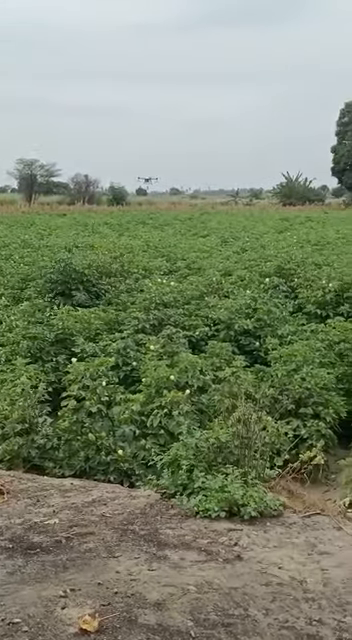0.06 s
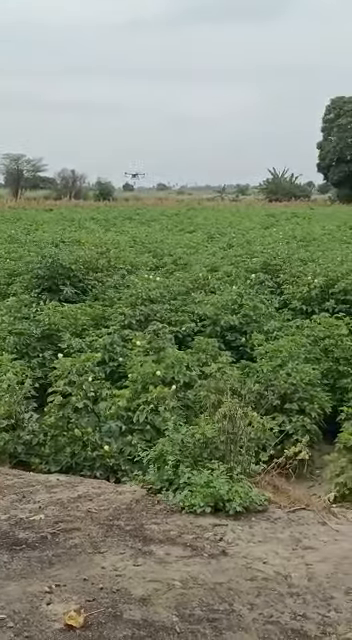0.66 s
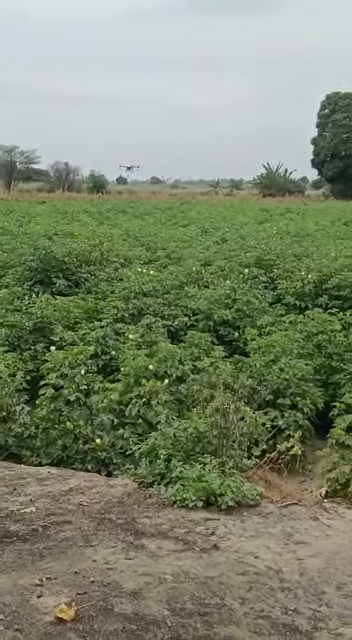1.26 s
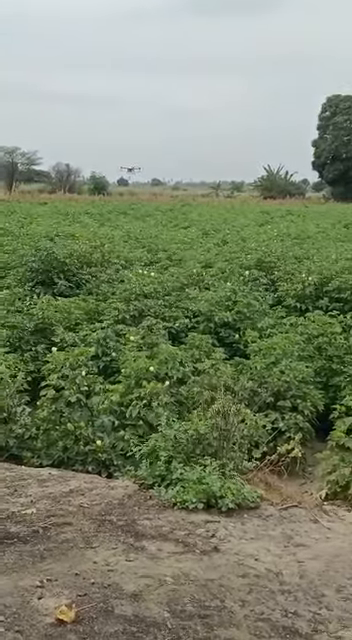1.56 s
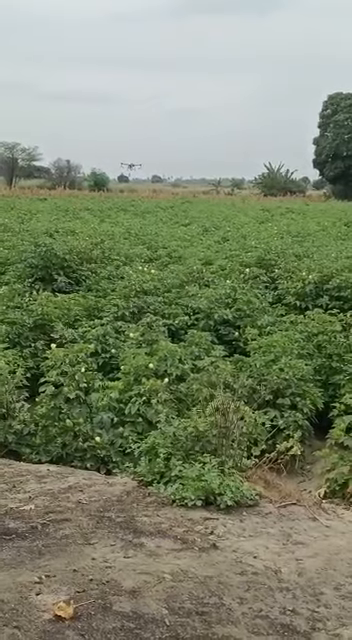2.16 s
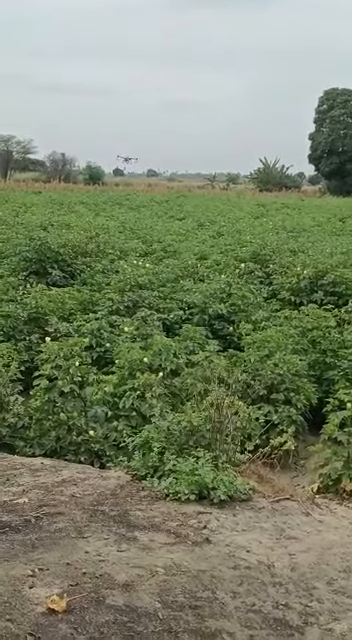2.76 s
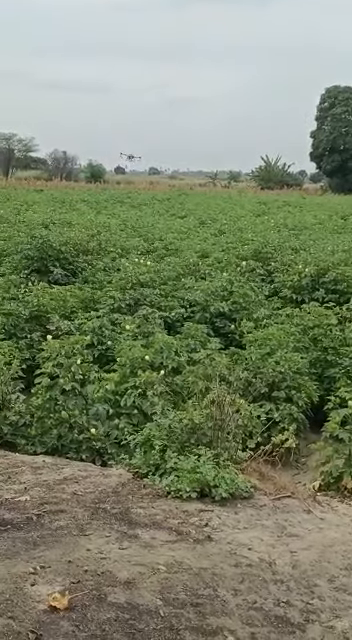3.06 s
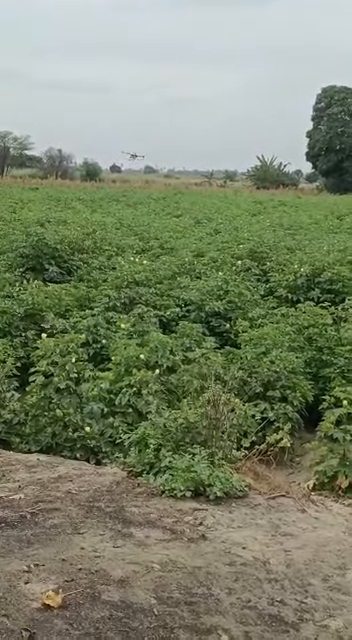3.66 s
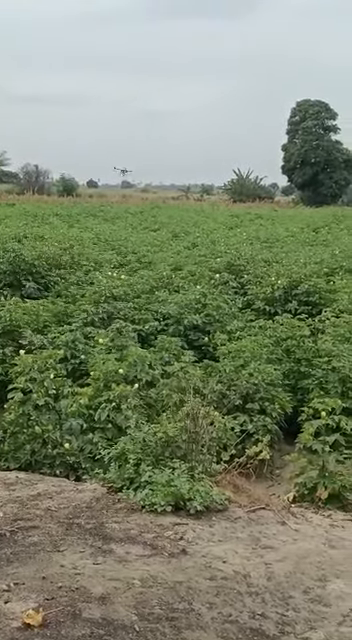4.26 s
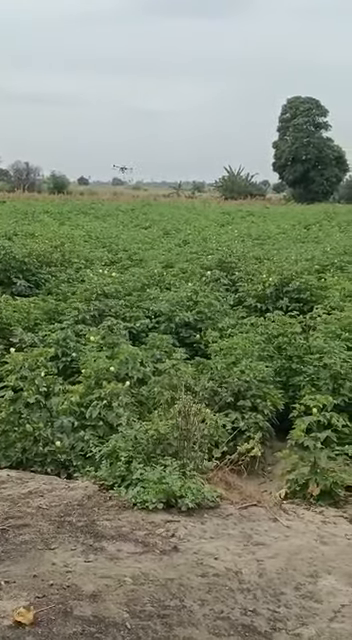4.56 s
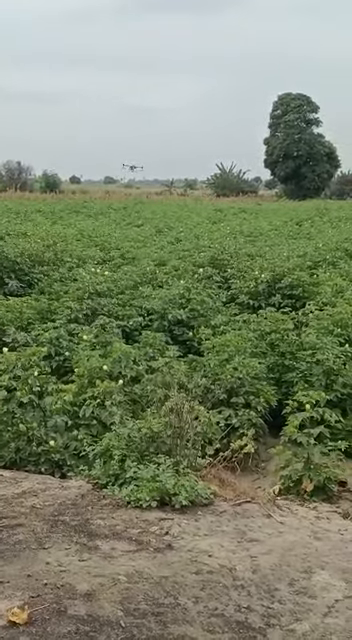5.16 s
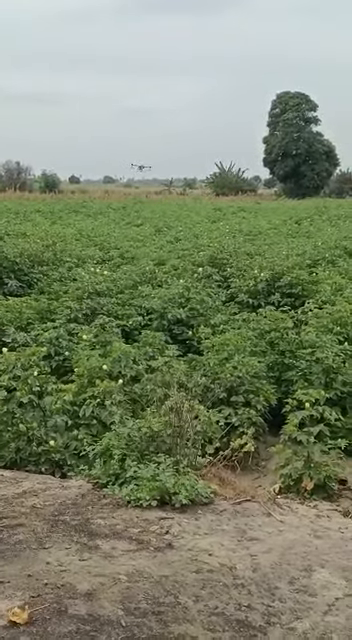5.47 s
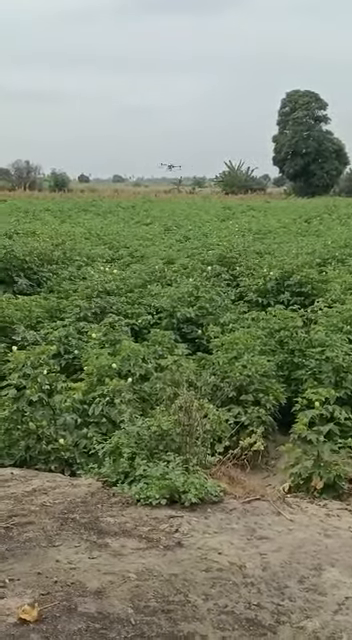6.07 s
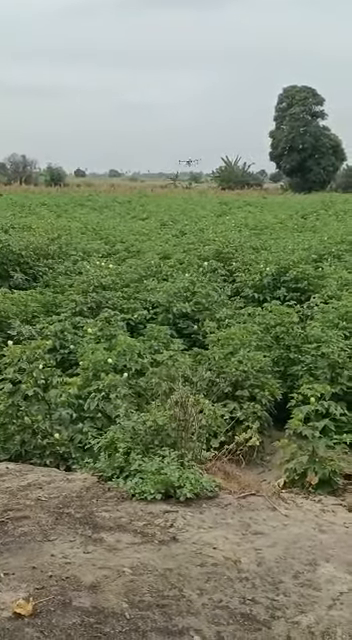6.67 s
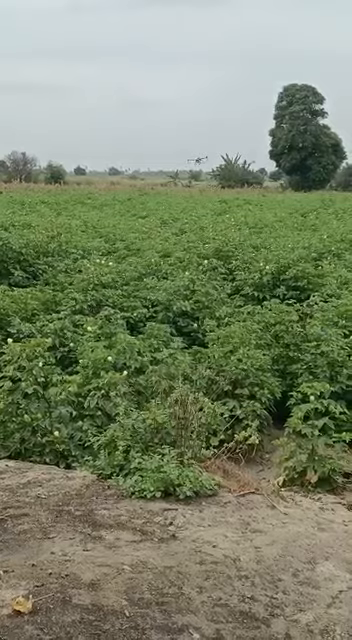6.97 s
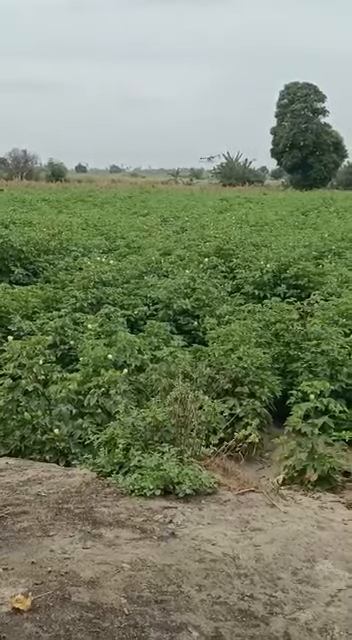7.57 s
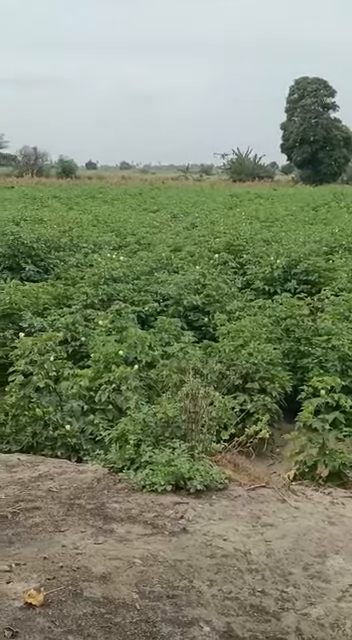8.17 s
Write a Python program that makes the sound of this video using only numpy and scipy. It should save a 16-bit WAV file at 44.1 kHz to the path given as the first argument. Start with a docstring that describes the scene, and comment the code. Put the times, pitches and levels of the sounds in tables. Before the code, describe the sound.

In an open field, irregular low wind rumble hits the microphone and dominates the sound. Thin chirps and a short whistled bird phrase, heard three times, come from the right. Behind them a distant drone whines quietly, speeds up briefly and carries on with a soft buzzing rush. The gusts weaken in the last part, as the drone rises once more in an airy hiss.

```python
"""Gusts buffet two microphone ports at the edge of a crop field, each port on its own. A far drone
gives a thin high whine, faint whistles come and go, and small birds chirp for the first five seconds.
At 0.9 s a songbird sings a four-note phrase. Near 2 s the drone revs up into hum and airy hiss,
and from 3 s its blades beat out a hollow buzzing rush. The phrase returns at 3.6 s and 6.6 s.
After 6 s the wind eases, and past 7 s the drone swells again into hiss and a broad surge."""
import sys
import numpy as np
from scipy import signal
from scipy.io import wavfile
from scipy.ndimage import uniform_filter1d

SR = 44100
rng = np.random.default_rng(int(sys.argv[2]) if len(sys.argv) > 2 else 0)


def transcribe(u):
    """Save the signal u as a 16-bit wav file named by the first command-line argument.

    u: samples, shape (n,) or (channels, n), limited to [-1, 1]; the rate is SR.
    q: integer samples, one column per channel.
    """
    v = np.clip(np.atleast_2d(u).T, -1, 1)
    q = np.round(v * 32767).astype(np.int16)
    wavfile.write(sys.argv[1], SR, q)


N = 371763
TIME = np.arange(N) / SR
LEFT, RIGHT = -1, 1


def from_db(db):
    """Decibels to gain."""
    return 10 ** (np.asarray(db) / 20)


def unit_rms(x):
    """Scale to rms 1."""
    return x / np.sqrt(np.mean(x ** 2) + 1e-20)


def in_time(rows):
    """Each column of a curve at every sample."""
    times_s, *columns = np.transpose(rows)
    return [np.interp(TIME, times_s, column) for column in columns]


def at_hz(spectrum, hz):
    """Read a spectrum on a log-frequency axis."""
    points_hz, points_db = np.transpose(spectrum)
    return np.interp(np.log(hz), np.log(points_hz), points_db)


def drift(rate_hz):
    """Smooth random motion, rms 1."""
    step, settle = 20, 4000
    pole = np.exp(-2 * np.pi * rate_hz * step / SR)
    white = rng.standard_normal(N // step + settle + 2)
    slow = signal.lfilter([1], [1, -2 * pole, pole * pole], white)[settle:]
    return np.interp(np.arange(N) / step, np.arange(len(slow)), unit_rms(slow))


def band(x, low_hz, high_hz, order=2):
    """Causal band-pass."""
    return signal.sosfilt(signal.butter(order, [low_hz, high_hz], "band", fs=SR, output="sos"), x)


def resonate(x, hz, width_hz):
    """One resonance, peak gain 1."""
    pole = np.exp(-np.pi * width_hz / SR)
    feedback = [1, -2 * pole * np.cos(2 * np.pi * hz / SR), pole * pole]
    return (1 - pole * pole) / 2 * signal.lfilter([1, 0, -1], feedback, x)


def place(x, left_db, lag_samples=3):
    """A source on the right reaches the left port weaker and later."""
    return np.array([from_db(left_db) * np.roll(x, lag_samples), x])


def stereo_noise(left_db, diffuse_db):
    """White noise from the right, plus a diffuse part in each port."""
    direct = place(rng.standard_normal(N), left_db)
    return direct + from_db(diffuse_db) * rng.standard_normal((2, N)) * from_db([[left_db], [0]])


# Steady air: freq_hz, density_db
AIR_SPECTRUM = [(60, 10.5), (200, 6.5), (340, 4), (450, -15.5), (620, 7), (760, -12), (960, -10),
                (1800, -16), (3200, -13.5), (4200, -21), (5400, -18), (7200, -24), (8500, -18),
                (10000, -25), (15000, -28.5)]

def field_air(level_db):
    """Background of the open field; each third of an octave wavers a little."""
    whites = [stereo_noise(left_db=-9.5, diffuse_db=3) for _ in range(2)]
    edges_hz, out = 60 * 2 ** (np.arange(25) / 3), 0
    for k, (low_hz, high_hz) in enumerate(zip(edges_hz, edges_hz[1:])):
        waver_db = (1.8 if low_hz < 3500 else .7) * drift(10)
        band_db = at_hz(AIR_SPECTRUM, np.sqrt(low_hz * high_hz)) + waver_db
        out += band(whites[k % 2], low_hz, high_hz, order=3) * from_db(band_db)
    return from_db(level_db + 1.1 * drift(3)) * unit_rms(out)


# Comb filter taps: delay_s, gain_db
COMB_TAPS = [(.0023, -17), (.0041, -31.5), (.0093, -11.5)]

def comb_colour(x):
    """A comb filter gives the background hiss a faint ringing colour."""
    return x + sum(from_db(db) * np.roll(x, round(delay_s * SR), axis=1) for delay_s, db in COMB_TAPS)


# The drone revs up, eases off, cruises: time_s, blade_rate_hz
BLADE_RATE = [(0, 66), (1.55, 77), (1.68, 92), (1.82, 100), (2.0, 110.6), (2.18, 108), (2.36, 103),
              (2.5, 88), (2.8, 78), (3.25, 78), (3.6, 75), (3.9, 88.4), (4.5, 94), (5.3, 79.3), (6.2, 80.6),
              (6.8, 83), (8.43, 71.5)]

def rotor_phase(wander, jitter):
    """Phase in radians, one cycle per passing blade."""
    rate_hz, = in_time(BLADE_RATE)
    return 2 * np.pi * np.cumsum(rate_hz * (1 + wander * drift(12) + jitter * drift(90))) / SR


def blade_slaps(phase, uneven_db, top_hz):
    """One uneven click per passing blade, dulled by distance."""
    clicks = np.diff(phase // (2 * np.pi), prepend=0) * from_db(uneven_db * drift(60))
    return band(unit_rms(clicks), 180, top_hz)


def swell_db(swells, rest_db):
    """Level curve: each swell climbs 20 dB over its attack, holds, sinks 20 dB over its release."""
    power = from_db(rest_db) ** 2
    for full_s, hold_s, db, attack_s, release_s in swells:
        away = np.maximum((full_s - TIME) / attack_s, (TIME - full_s - hold_s) / release_s).clip(0)
        power += from_db(db - 20 * away) ** 2
    return 10 * np.log10(power)


def rotor_noise(modes, slaps, band_hz, left_db, diffuse_db, waver_db=6, flicker_db=2.5):
    """Noise and blade slaps in steep resonances, each wavering on its own; rms 1."""
    drives = [band(stereo_noise(left_db, diffuse_db) + place(slaps, left_db), *band_hz, order=3)
              for _ in range(2)]
    out = 0
    for k, (hz, width_hz, db) in enumerate(modes):
        gain = from_db(db + waver_db * np.tanh(drift(10)) + flicker_db * drift(30))
        out += gain * resonate(resonate(drives[k % 2], hz, 2 * width_hz), hz, 2 * width_hz)
    return unit_rms(out)


# Rush envelope: time_s, level_db
RUSH_LEVEL = [(0, -80), (3.05, -83.5), (3.15, -69), (3.5, -70.5), (4.3, -68.5), (4.58, -73.5), (4.66, -58),
              (4.85, -70), (5.0, -66.5), (6.2, -71), (8.43, -81.5)]
# Rush resonances: centre_hz, width_hz, gain_db
RUSH_MODES = [(753, 126, 4), (810, 7.1, -32), (1067, 250, -1.5), (1276, 93, -3), (1667, 161, 2.5),
              (1750, 70, -15), (2362, 92, 4), (2665, 160, -3.5), (3490, 360, -11), (3764, 28, 0.5)]

def rotor_rush(phase, slaps, gain_db):
    """Hollow rush; each passing blade gives it a puff."""
    noise = rotor_noise(RUSH_MODES, from_db(-3) * slaps, (470, 4100), left_db=-7, diffuse_db=-11)
    chop = unit_rms(np.exp(0.31 * np.cos(phase)))
    return from_db(gain_db + in_time(RUSH_LEVEL)[0]) * noise * chop


# Surge envelope: full_s, hold_s, level_db, attack_s, release_s
SURGE_SWELLS = [(7.35, 0.42, -58.5, 0.76, 0.66)]
# Surge resonances: centre_hz, width_hz, gain_db
SURGE_MODES = [(767, 110, -1), (1200, 110, 1.5), (1585, 273, -2), (1540, 180, -6.5), (1953, 260, -4.5),
               (2268, 35, -2.5), (2200, 400, -17)]

def rotor_surge(slaps, gain_db):
    """One broad, late surge of the rush."""
    noise = rotor_noise(SURGE_MODES, from_db(-5) * slaps, (570, 3100), left_db=-9.5, diffuse_db=-10)
    return from_db(gain_db + swell_db(SURGE_SWELLS, rest_db=-79)) * noise


# Hiss envelope: full_s, hold_s, level_db, attack_s, release_s
HISS_SWELLS = [(1.935, 0.32, -62, 0.18, 0.31), (7.2, 0.29, -64, 0.56, 0.37)]
# Hiss resonances: centre_hz, width_hz, gain_db
HISS_MODES = [(473, 14, -12), (1273, 31, -6), (1857, 350, -1.5), (2170, 40, 2), (2366, 110, 0.5),
              (2823, 150, 0.5), (3210, 190, 2), (3684, 69, 4), (4384, 100, -5), (5030, 160, 0.5),
              (5430, 140, -3.5), (5650, 26, 2), (6240, 450, -9.5), (7860, 460, -16.5), (8650, 240, -12),
              (11600, 1100, -23.5)]

def rotor_hiss(slaps, gain_db):
    """Airy hiss of the rotors, swelling twice."""
    noise = rotor_noise(HISS_MODES, from_db(3) * slaps, (504, 13200), left_db=-5.5, diffuse_db=4)
    return from_db(gain_db + swell_db(HISS_SWELLS, rest_db=-79.5)) * noise


# Hum partials: blade_harmonic, gain_db
HUM_HARMONICS = [(2, -2.5), (3, 4.5), (4, -16), (5, -2), (6, -5.5), (7, -6.5)]
# Hum envelope: full_s, hold_s, level_db, attack_s, release_s
HUM_SWELLS = [(1.86, 0.4, -65.5, 0.074, 0.2)]

def rotor_hum(phase, waver_db, stray_rad):
    """Low blade harmonics, heard as the drone revs up."""
    hum = sum(from_db(db + waver_db * drift(21)) * np.sin(k * phase + stray_rad * drift(18))
              for k, db in HUM_HARMONICS)
    return place(from_db(swell_db(HUM_SWELLS, rest_db=-93.5)) * hum, left_db=-16)


def note_span(start_s, length_s):
    """A note's sample indices and its progress, 0 to 1."""
    span = np.flatnonzero((TIME >= start_s) & (TIME < start_s + length_s))
    return span, (TIME[span] - start_s) / length_s


# Buzzing notes in the hiss and rush: start_s, length_s, start_hz, end_hz, level_db
HOLLOW_NOTES = [(1.92, 0.062, 1700, 1760, -63), (1.93, 0.21, 1900, 1810, -63.5),
                (2.02, 0.185, 3250, 3170, -66), (1.915, 0.038, 2270, 2160, -60),
                (7.59, .1, 1720, 1570, -58.5), (2.015, .27, 1190, 1315, -60.5),
                (2.147, 0.17, 2220, 2150, -58), (2.387, 0.17, 2210, 2240, -63.5),
                (3.095, 0.12, 1210, 1280, -65.5), (3.1, 0.15, 1800, 1930, -73), (3.09, 0.36, 844, 870, -76),
                (3.27, 0.11, 1310, 1270, -70), (3.877, 0.15, 700, 747, -64.5),
                (4.02, 0.47, 2400, 2340, -69), (4.48, 0.096, 1620, 1630, -69.5),
                (4.615, 0.1, 2350, 2100, -67), (4.76, 0.13, 1640, 1580, -71.5),
                (4.613, 0.11, 730, 780, -63), (4.603, 0.13, 1760, 1770, -63.5), (4.96, 0.17, 790, 850, -67),
                (4.9, 0.1, 1610, 1680, -64.5), (5.163, 0.13, 844, 650, -66), (5.152, 0.42, 2320, 2200, -76),
                (5.453, 0.16, 850, 743, -65), (5.83, 0.18, 780, 757, -67.5), (7.154, 0.12, 750, 830, -64.5),
                (7.25, 0.16, 1230, 1260, -62), (7.45, 0.22, 1240, 1140, -62),
                (7.58, 0.11, 1380, 1363, -62.5), (7.47, 0.21, 774, 756, -60.5),
                (7.734, 0.1, 770, 730, -61.5), (7.813, 0.297, 1290, 1184, -65), (7.942, .12, 767, 710, -66),
                (8.113, .14, 730, 720, -66.5), (8.09, 0.2, 1190, 1260, -66)]

def hollow_buzz(phase, gain_db, width_hz, flicker_db):
    """A narrow gliding resonance lifts the two or three blade harmonics under it."""
    rate_hz, = in_time(BLADE_RATE)
    out, flicker = np.zeros(N), from_db(flicker_db * drift(32))
    for start_s, length_s, start_hz, end_hz, db in HOLLOW_NOTES:
        span, progress = note_span(start_s, length_s)
        centre_hz = start_hz + (end_hz - start_hz) * progress
        harmonics = np.round(start_hz / rate_hz[span].mean()) + np.arange(-5, 6)[:, None]
        lift = np.exp(-((harmonics * rate_hz[span] - centre_hz) / width_hz) ** 2 / 2)
        partials = lift * np.sin(harmonics * phase[span] + rng.normal(0, 1, harmonics.shape))
        out[span] += from_db(db) * np.sin(np.pi * progress) ** .5 * flicker[span] * partials.sum(axis=0)
    return from_db(gain_db) * place(out, left_db=-13)


# Whine envelope: time_s, level_db
WHINE_LEVEL = [(0.0, -77), (0.68, -85.5), (1.01, -71.5), (1.24, -84.5), (1.52, -83), (1.76, -102),
               (2.63, -95), (2.72, -77.5), (2.96, -63.5), (3.31, -96), (3.85, -83.5), (4.48, -85),
               (4.84, -99.5), (5.87, -98.5), (6.01, -84), (6.27, -97), (6.57, -89.5), (7.28, -100),
               (7.61, -87), (7.65, -73.5), (7.84, -85.5), (8.08, -79), (8.12, -94), (8.43, -90)]
# Whine tuning: time_s, pitch_hz, sidebands_db
WHINE_PITCH = [(0, 12880, -16.5), (1.5, 12840, -16), (1.68, 12720, -7), (2.55, 12400, 0.5),
               (2.76, 12810, 0.5), (2.95, 12700, -6), (3.2, 12740, -3.5), (3.45, 12900, -5),
               (3.9, 12830, -11), (4.7, 12880, -7.5), (6.0, 12880, -7.5), (7.6, 12810, -8),
               (8.43, 12890, -13)]
# Whine sidebands: offset_blade_rates, gain_db
WHINE_SIDEBANDS = [(-4, -12), (1, -2.5), (4, 3)]

def whine(gain_db, left_db, lag_s):
    """Thin high tone, perhaps from the motor drives; sidebands set by the blade rate beat against it."""
    level_db, = in_time(WHINE_LEVEL)
    rate_hz, = in_time(BLADE_RATE)
    pitch_hz, sidebands_db = in_time(WHINE_PITCH)
    pitch_hz += 13 * drift(150) + 8 * drift(8.4)
    partials = [(0, 0)] + [(k, db + sidebands_db + 2 * drift(9.5)) for k, db in WHINE_SIDEBANDS]
    tone = sum(from_db(db) * np.exp(2j * np.pi * np.cumsum(pitch_hz + k * rate_hz) / SR)
               for k, db in partials)
    rasp = from_db(-16) * unit_rms(band(rng.standard_normal((2, N)), 12450, 13400, order=3))
    ports = np.real([tone * np.exp(-2j * np.pi * pitch_hz * lag_s), tone]) + rasp
    flicker_db = 2 * drift(60) + 2 * drift(9.3)
    return ports * from_db([[left_db], [0]]) * from_db(gain_db + level_db + flicker_db)


def slurs(notes, buzz_hz, buzz_depth, flicker_db, taper, lag_samples=3):
    """Each note is a sine gliding along an arc; a fast pitch wobble makes it buzz."""
    out = np.zeros((2, N))
    wobble = 1 + buzz_depth * drift(buzz_hz)
    flicker = from_db(flicker_db * drift(79))
    for start_s, length_s, start_hz, mid_hz, end_hz, db, left_db in notes:
        span, progress = note_span(start_s, length_s)
        arc = np.polyfit([0, .5, 1], [start_hz, mid_hz, end_hz], 2)
        pitch_hz = np.polyval(arc, progress) * wobble[span]
        phase = 2 * np.pi * np.cumsum(pitch_hz) / SR
        envelope = from_db(db) * np.abs(np.sin(np.pi * progress)) ** taper * flicker[span]
        left = from_db(left_db) * np.sin(phase - 2 * np.pi * pitch_hz * lag_samples / SR)
        out[:, span] += envelope * np.array([left, np.sin(phase)])
    return out


def field_echo(x, t60_s, wet_db):
    """Leaves and ground scatter a thin, quickly dying tail."""
    delay_s = TIME[:SR // 2]
    scatter = rng.standard_normal((2, len(delay_s))) * from_db(-60 * delay_s / t60_s) * (delay_s > .006)
    scatter /= np.sqrt(np.sum(scatter ** 2, axis=1, keepdims=True))
    return x + from_db(wet_db) * signal.fftconvolve(x, scatter, axes=1)[:, :N]


# Thin whistles: start_s, length_s, start_hz, end_hz, level_db
WHISTLES = [(1.507, 0.05, 2580, 2530, -62.5), (1.68, 0.036, 3770, 3790, -62),
            (1.7, 0.16, 4050, 4550, -63.5), (1.768, 0.16, 4000, 4060, -65),
            (1.839, 0.42, 5730, 5460, -62.5), (2.246, 0.15, 4540, 4100, -66),
            (2.283, 0.18, 4000, 3680, -71), (3.448, 0.32, 5650, 5420, -68), (3.55, 0.24, 6500, 6380, -72.5),
            (4.473, 0.28, 5400, 5050, -70.5), (5.77, 0.08, 4400, 4500, -69),
            (5.825, 0.078, 5400, 3576, -62.5), (5.885, 0.085, 3610, 3240, -65),
            (6.005, 0.1, 2980, 2184, -64.5), (6.045, 0.046, 5400, 7690, -67),
            (6.096, 0.03, 7500, 4400, -68), (6.919, 0.26, 3364, 2985, -61),
            (6.888, 0.56, 5010, 4920, -71.5), (7.1, 0.18, 5530, 5820, -68), (7.632, 0.1, 5540, 4686, -58.5),
            (7.721, 0.089, 3880, 2100, -51.5)]

def whistles(gain_db, left_db):
    """Faint unsteady glides, blurred by scattering."""
    notes = [(start_s, length_s, start_hz, np.sqrt(start_hz * end_hz), end_hz, db, left_db)
             for start_s, length_s, start_hz, end_hz, db in WHISTLES]
    glides = slurs(notes, buzz_hz=300, buzz_depth=.004, flicker_db=4, taper=.8)
    return from_db(gain_db) * field_echo(glides, t60_s=0.15, wet_db=-2)


# Chirps: start_s, length_s, start_hz, end_hz, level_db
CHIRPS = [(.005, 0.049, 4750, 6000, -55), (0.624, 0.037, 5020, 5400, -68), (0.662, .016, 5960, 7060, -61.5),
          (1.029, 0.082, 5220, 5770, -62.5), (1.355, 0.056, 5170, 5370, -68),
          (1.39, 0.018, 6400, 7040, -64.5), (1.511, 0.022, 5300, 5470, -61),
          (1.602, 0.049, 5240, 4940, -58.5), (1.637, 0.037, 6450, 6300, -69),
          (2.227, 0.03, 5080, 5580, -53.5), (2.47, .02, 5176, 4995, -57), (2.476, 0.021, 4940, 5180, -56),
          (2.668, 0.018, 5010, 5100, -53.5), (2.708, 0.017, 4990, 4370, -62),
          (2.713, 0.0203, 4520, 5500, -58), (2.748, 0.016, 5100, 5220, -52),
          (2.776, 0.062, 5290, 5040, -66), (3.095, 0.011, 5080, 5034, -56.5),
          (3.106, 0.014, 4480, 5450, -59), (3.12, 0.015, 5460, 5200, -52),
          (3.266, 0.023, 5070, 4845, -57.5), (3.309, 0.023, 4860, 4900, -70),
          (4.356, 0.043, 5110, 5450, -59), (5.059, 0.021, 5190, 5320, -59.5),
          (5.09, 0.022, 4990, 5950, -61.5), (5.105, 0.018, 6540, 7300, -71),
          (5.317, 0.049, 5192, 4780, -60.5)]

def small_birds(gain_db, left_db, mid_share=0.26):
    """High buzzy chirps, most flicking upward."""
    notes = [(start_s, length_s, start_hz, start_hz + mid_share * (end_hz - start_hz), end_hz, db, left_db)
             for start_s, length_s, start_hz, end_hz, db in CHIRPS]
    chirps = slurs(notes, buzz_hz=500, buzz_depth=.033, flicker_db=3.5, taper=.85)
    return from_db(gain_db) * field_echo(chirps, t60_s=0.27, wet_db=-4.5)


# Slurs of the phrase: offset_s, length_s, start_hz, mid_hz, end_hz, level_db, left_db
PHRASE = [(0, 0.025, 3310, 3202, 3080, 3.5, -23), (0.040, 0.018, 2320, 1960, 1780, -7, -16),
          (0.09, 0.031, 1623, 2557, 2710, 0.5, -12), (.111, .061, 2760, 2520, 1800, 3.5, -14.5),
          (0.193, .042, 1652, 2224, 1700, -1, -15.5)]
# Repeats of the phrase: start_s, level_db, onset_stretch, fade_db_per_s
SONGS = [(0.938, -43.5, 0.97, -13), (3.61, -40, 0.99, 20), (6.581, -42, 1.0, 27)]

def songbird(gain_db):
    """One whistled phrase, three times; two of its five slurs join into one note."""
    notes = [(start_s + stretch * offset_s, length_s, *arc_hz, song_db + db - fade * offset_s, left_db)
             for start_s, song_db, stretch, fade in SONGS
             for offset_s, length_s, *arc_hz, db, left_db in PHRASE]
    song = slurs(notes, buzz_hz=200, buzz_depth=0.0041, flicker_db=2, taper=1)
    return from_db(gain_db) * field_echo(song, t60_s=0.46, wet_db=-11)


def bump(centre_s, half_width_s):
    """Gaussian pulse, peak 1."""
    return np.exp(-np.minimum(((TIME - centre_s) / half_width_s) ** 2, 20))


# Buffets on top of the breeze: time_s, level_db, port, brightening_oct
BUFFETS = [(0.211, -45.5, 1, -0.38), (0.354, -49, -1, 0.53), (0.36, -44, 1, 0.17), (0.575, -35, 1, -0.18),
           (0.629, -38, 1, 0.0), (0.668, -39, -1, -0.09), (0.735, -39.5, -1, -0.051),
           (0.857, -33.5, -1, 0.53), (1.058, -34.5, -1, -0.01), (1.062, -43, 1, -0.049),
           (1.135, -37.5, -1, 0.41), (1.19, -37, -1, 0.077), (1.208, -34.5, 1, -0.24),
           (1.276, -37.5, -1, 0.071), (1.331, -39.0, 1, -0.32), (1.35, -45, -1, 0.46),
           (1.425, -43, 1, -0.35), (1.543, -40.5, -1, -0.69), (1.853, -42.5, -1, -0.56),
           (1.854, -43, 1, 0.34), (1.901, -35.0, 1, -0.15), (1.933, -39.5, -1, -0.14),
           (2.081, -38.5, 1, -0.15), (2.088, -41, -1, 0.23), (2.218, -37.0, 1, 0.071),
           (2.301, -32, 1, 0.19), (2.343, -34.5, -1, 0.37), (2.47, -45, 1, 0.3), (2.506, -39.0, 1, 0.6),
           (2.576, -34.5, -1, 0.11), (2.604, -34.0, 1, 0.3), (2.685, -33.5, -1, -0.12),
           (2.74, -38.5, -1, 0.16), (2.74, -31.5, 1, -0.12), (2.887, -36, 1, 0.11), (2.931, -38, -1, 0.21),
           (2.992, -34.5, -1, 0.6), (3.042, -37.5, 1, -0.13), (3.109, -39, -1, -0.55),
           (3.169, -32.5, -1, -0.36), (3.348, -36.5, -1, 0.51), (3.4, -43, 1, -0.45),
           (3.413, -35.5, -1, -0.29), (3.473, -35, -1, 0.0094), (3.606, -35.5, -1, 0.23),
           (3.678, -42, 1, 0.38), (3.708, -40, -1, 0.41), (3.829, -31, -1, 0.31), (3.955, -43, -1, -0.5),
           (4.061, -41.5, -1, 0.19), (4.162, -42, 1, -0.05), (4.274, -44.5, -1, -0.39),
           (4.408, -34.5, 1, -0.05), (4.461, -33, -1, 0.3), (4.496, -34.5, 1, 0), (4.517, -34.0, -1, -0.65),
           (4.602, -37.5, -1, -0.49), (4.662, -34.5, 1, -0.4), (4.698, -38.5, 1, 0.18),
           (4.745, -38, 1, -0.048), (4.857, -38, 1, -0.38), (4.929, -36.5, -1, -0.35),
           (4.936, -48, 1, 0.59), (5.06, -34.5, -1, 0.66), (5.092, -33, 1, -0.6), (5.164, -41.5, 1, -0.09),
           (5.202, -37, -1, 0.15), (5.262, -32, 1, 0.3), (5.337, -33, 1, 0.25), (5.351, -36, -1, 0.12),
           (5.393, -30.5, 1, 0.039), (5.501, -40, -1, 0.27), (5.581, -46.5, 1, -0.1),
           (5.587, -39, -1, -0.53), (5.649, -43.5, -1, -0.6), (5.806, -42.5, 1, 0.61),
           (5.934, -43, -1, -0.5), (6.507, -50, -1, -0.36), (6.766, -40.5, 1, -0.14),
           (6.8, -46.5, -1, -0.38), (6.85, -50, 1, -0.033), (6.895, -46, 1, 0.67), (7.004, -40.5, 1, 0.2),
           (7.312, -45.5, 1, -0.4), (7.369, -42, 1, 0.24), (7.505, -39, 1, 0.46), (7.669, -42.5, 1, 0.15),
           (7.829, -44.5, 1, -0.13)]
# Lulls between eddies: time_s, depth_db, port
LULLS = [(0.894, 13, 1), (1.086, 14, 1), (2.175, 9.7, -1), (2.488, 18, 1), (2.499, 14, -1), (2.587, 18, 1),
         (2.815, 27, -1), (2.825, 15.2, 1), (3.3, 8, -1), (4.356, 20, -1), (4.558, 29, 1), (4.96, 19, 1),
         (4.962, 6.2, -1), (5.194, 12, 1), (5.678, 14.3, 1), (5.702, 22, -1), (6.973, 20, 1)]

def wind_strength(gusts, port, eddy_db):
    """Level and brightening at one port from the breeze, its buffets and its lulls."""
    breeze_db = in_time(gusts)[0] + eddy_db * np.minimum(drift(10.3), .6)
    power, bright_oct = from_db(breeze_db) ** 2, 0
    for time_s, db, side, octaves in BUFFETS:
        if side == port:
            buffet = bump(time_s, half_width_s=0.017)
            power += (from_db(db) * buffet) ** 2
            bright_oct += octaves * buffet
    lulls_db = sum(db * bump(time_s, half_width_s=0.02) for time_s, db, side in LULLS if side == port)
    return 10 * np.log10(power) - lulls_db, bright_oct


# Rumble of a moderate breeze: freq_hz, density_db
RUMBLE_SPECTRUM = [(20, -27.5), (45, -17), (75, -1), (110, -0.5), (170, -4.5), (260, -10), (400, -13.5),
                   (600, -17), (850, -23.5), (1200, -82.5)]

def rumble(level_db, bright_oct, corner_hz, steepness, lump_db, flutter_db):
    """Turbulence at one port: harder wind sheds smaller eddies, so the rumble reaches higher."""
    moderate_db, db_per_oct = -38, 18
    lumps = np.clip(drift(28), -2, 2)
    reach_hz = corner_hz * 2 ** (bright_oct + (level_db - moderate_db + flutter_db * lumps) / db_per_oct)
    whites = rng.standard_normal((2, N))
    edges_hz, out = 18 * 2 ** (np.arange(13) / 2), 0
    for k, (low_hz, high_hz) in enumerate(zip(edges_hz, edges_hz[1:])):
        centre_hz = np.sqrt(low_hz * high_hz)
        gain = from_db(at_hz(RUMBLE_SPECTRUM, centre_hz)) / np.sqrt(1 + (centre_hz / reach_hz) ** steepness)
        out += gain * band(whites[k % 2], low_hz, high_hz, order=3)
    out *= from_db(lump_db * lumps)
    # Over more than a few eddies, the gust alone sets the loudness.
    power = uniform_filter1d(uniform_filter1d(out ** 2, size=1300), size=700)
    return from_db(level_db) * out / np.sqrt(power + 1e-20)


# Single eddies at the left port: time_s, level_db
THUMPS = [(.851, -25), (0.876, -36.5), (2.349, -30.5), (3.339, -28.5), (3.354, -24.5), (3.387, -29.5),
          (3.505, -28), (3.533, -22), (3.603, -26.5), (3.828, -22), (5.063, -24), (5.468, -31),
          (5.501, -31)]

def thumps(width_s, top_hz):
    """An eddy crossing the port gives one quick dip of pressure."""
    dips = sum(-from_db(db) * np.exp(-np.abs(TIME - time_s + width_s).clip(0, .1) / width_s)
               for time_s, db in THUMPS)
    return band(dips, 110, top_hz)


def port_filter(x, low_hz, top_hz):
    """The port passes no slow pressure, and eddies smaller than it cancel across it."""
    x = signal.sosfilt(signal.butter(2, low_hz, "high", fs=SR, output="sos"), x)
    return signal.sosfilt(signal.butter(10, top_hz, fs=SR, output="sos"), x)


# Breeze at each port: time_s, level_db
GUSTS_LEFT = [(0.0, -83.5), (0.13, -83), (0.18, -58.5), (0.52, -50), (0.62, -36), (0.95, -43.5),
              (1.3, -39.5), (1.7, -48.5), (2.2, -46.5), (2.5, -44.5), (2.62, -42), (2.95, -39.0),
              (3.65, -33.5), (3.9, -43.5), (4.2, -53.0), (4.33, -52.5), (4.45, -39), (4.58, -48),
              (5.05, -41.5), (5.5, -39.5), (5.66, -59.0), (5.7, -64), (5.76, -54), (5.95, -44), (6.16, -64),
              (6.75, -64.5), (6.93, -79), (7.68, -80.5), (7.95, -64), (8.43, -77)]
GUSTS_RIGHT = [(0.0, -56.5), (0.48, -53), (0.56, -43), (0.82, -47.5), (0.9, -62), (1.0, -50.5),
               (1.33, -44.0), (1.56, -63), (1.66, -59.5), (1.8, -47.0), (2.4, -48), (3.1, -43), (3.27, -71),
               (3.39, -44), (3.6, -60.5), (4.0, -51.0), (4.3, -57), (4.42, -42.0), (5.35, -39), (5.6, -54),
               (5.72, -62.5), (5.78, -35.5), (6.0, -79), (6.55, -65), (6.78, -43.5), (7.05, -44),
               (7.14, -67), (7.35, -51.5), (7.8, -50.5), (8.1, -67), (8.43, -67)]
# Left-port rumble turns brighter and duller: time_s, brightening_oct
LEFT_BRIGHTNESS = [(0, 0.083), (0.65, 0.18), (1.0, 0.018), (1.5, 0.23), (2.0, -0.05), (2.7, 0.085),
                   (3.7, 0.017), (4.0, 0.35), (4.4, -0.22), (4.7, -.4), (5.1, -0.021), (5.7, .1),
                   (6.0, -.4), (6.5, 0.0089)]

def wind():
    """Each port is buffeted on its own; the left rumbles higher up and takes the thumps."""
    left_db, left_oct = wind_strength(GUSTS_LEFT, LEFT, eddy_db=2)
    left_oct += in_time(LEFT_BRIGHTNESS)[0]
    left = rumble(left_db, left_oct, corner_hz=258.6, steepness=8.55, lump_db=2.5, flutter_db=3.5)
    right_db, right_oct = wind_strength(GUSTS_RIGHT, RIGHT, eddy_db=2.5)
    right = rumble(right_db, right_oct, corner_hz=157.2, steepness=11.7, lump_db=4.5, flutter_db=-2)
    left = from_db(1.06) * left + from_db(7.5) * thumps(width_s=0.0014, top_hz=645)
    return np.array([port_filter(left, low_hz=50.4, top_hz=804),
                     port_filter(from_db(1.54) * right, low_hz=47, top_hz=340.6)])


def scene():
    """Open field, far drone and birds under wind on the ports."""
    phase = rotor_phase(wander=.006, jitter=.008)
    slaps = blade_slaps(phase, uneven_db=2.5, top_hz=6000)
    drone_noise = rotor_rush(phase, slaps, gain_db=-7.5)
    drone_noise += rotor_surge(slaps, gain_db=-5.5) + rotor_hiss(slaps, gain_db=-0.94)
    drone_tones = rotor_hum(phase, waver_db=4, stray_rad=0.84)
    drone_tones += hollow_buzz(phase, gain_db=-1, width_hz=60.4, flicker_db=4)
    drone_tones += whine(gain_db=5, left_db=-3, lag_s=59e-6)
    background = comb_colour(field_air(level_db=-76) + drone_noise) + drone_tones
    gusts = wind()
    birds = songbird(gain_db=-3.5) + small_birds(gain_db=-2, left_db=-18)
    return background + whistles(gain_db=-6.5, left_db=-9) + birds + gusts


def record(dry):
    """Steep treble cut."""
    cutoff_hz = 15300
    return signal.sosfilt(signal.ellip(10, .2, 80, cutoff_hz, fs=SR, output="sos"), dry)


dry = scene()
out = record(dry)
transcribe(out)
```